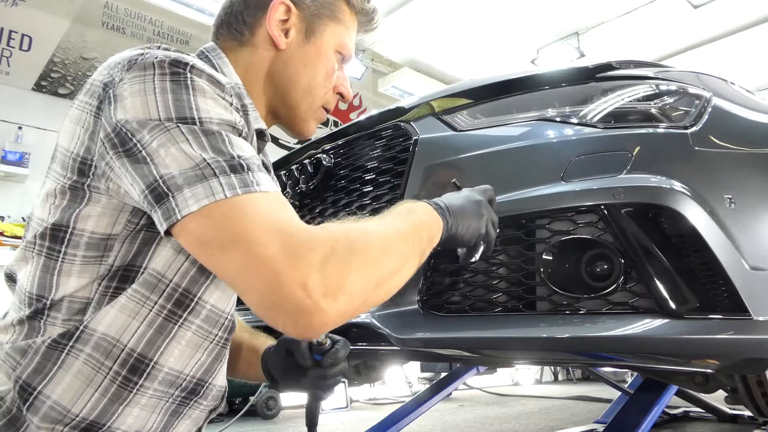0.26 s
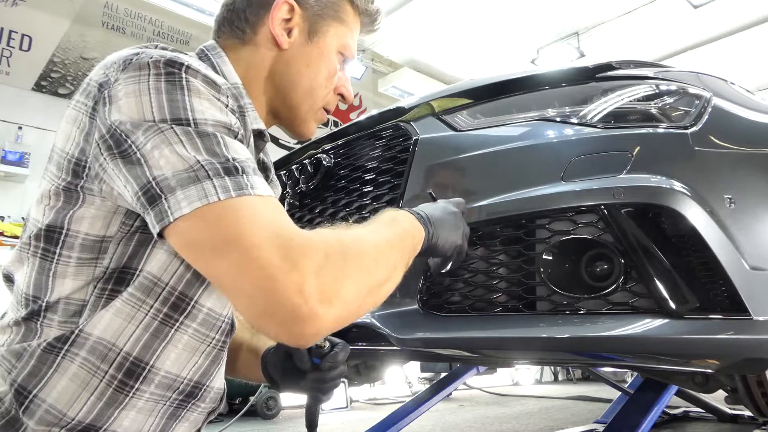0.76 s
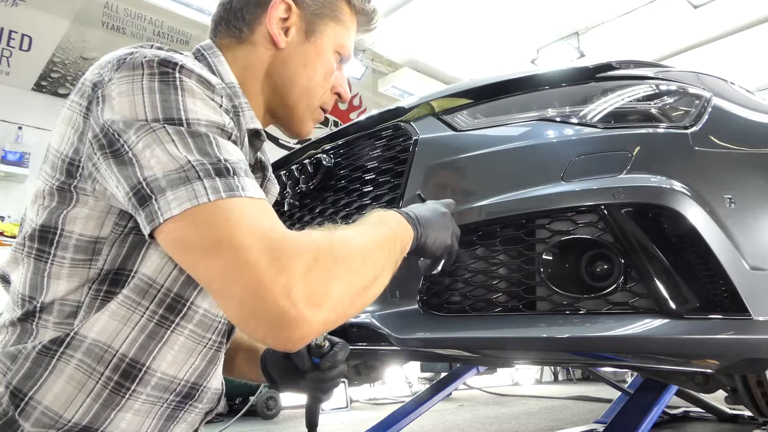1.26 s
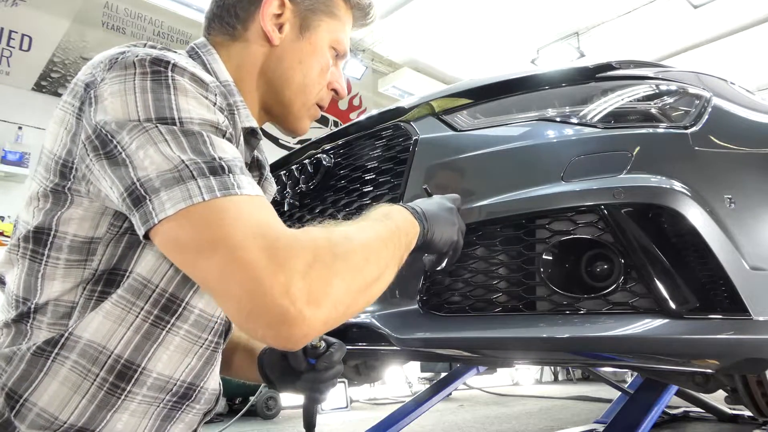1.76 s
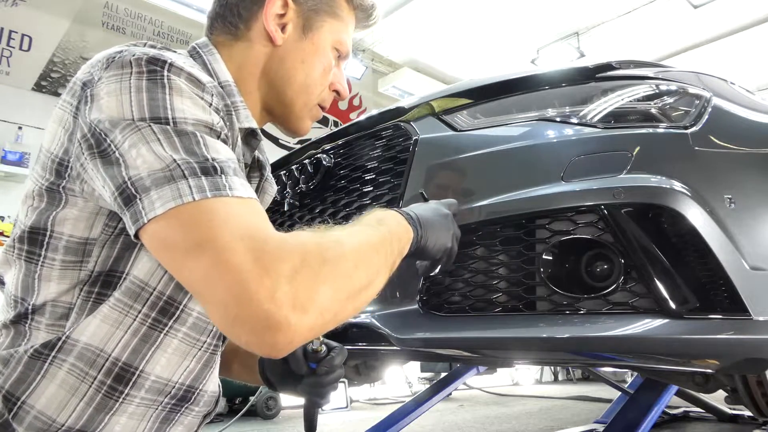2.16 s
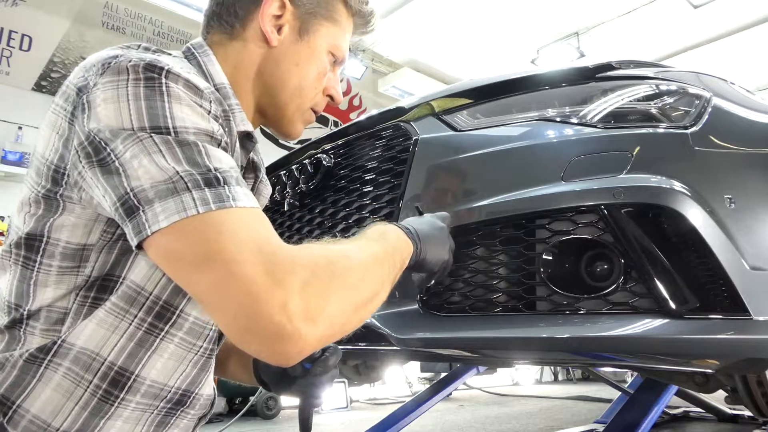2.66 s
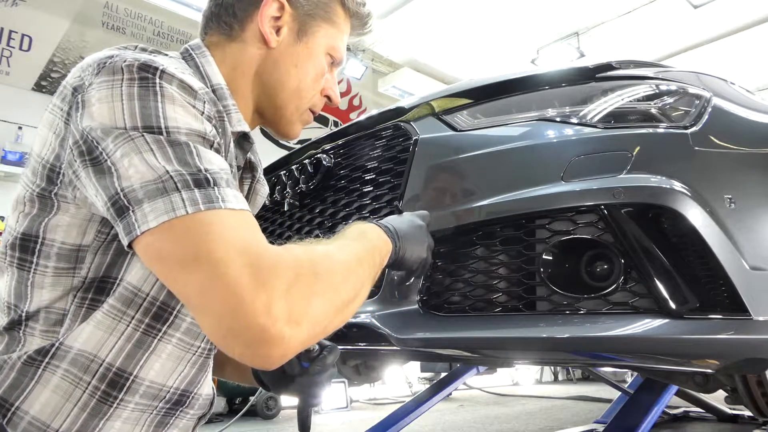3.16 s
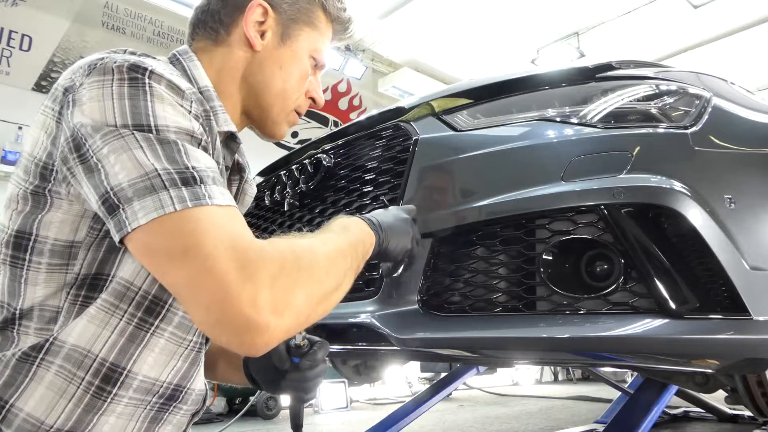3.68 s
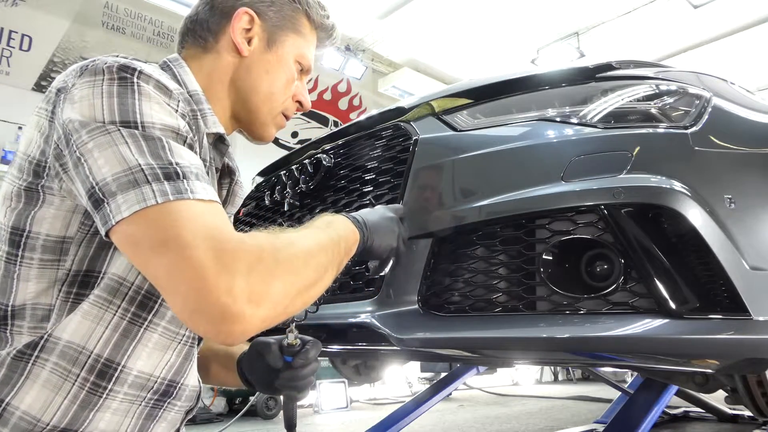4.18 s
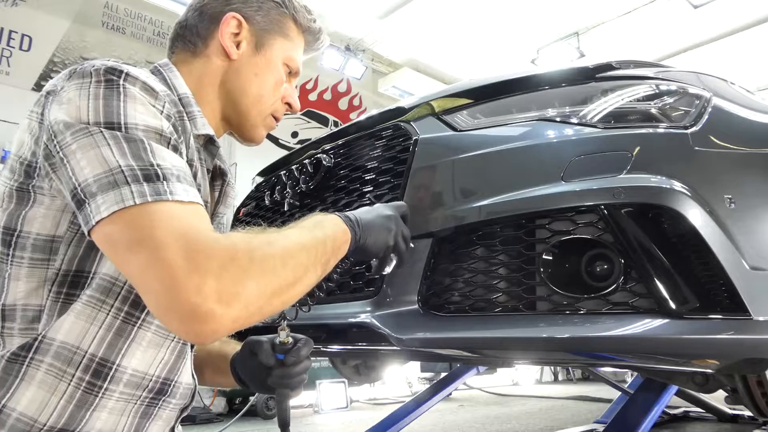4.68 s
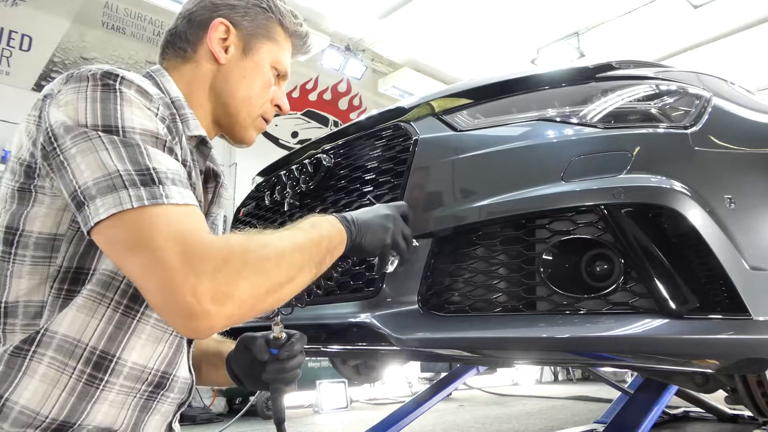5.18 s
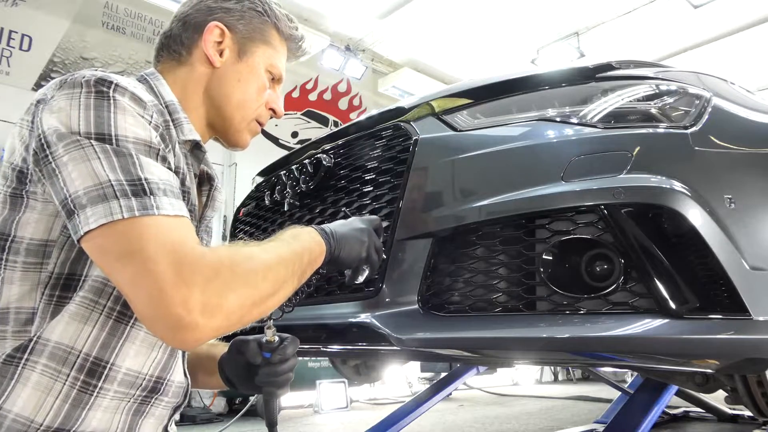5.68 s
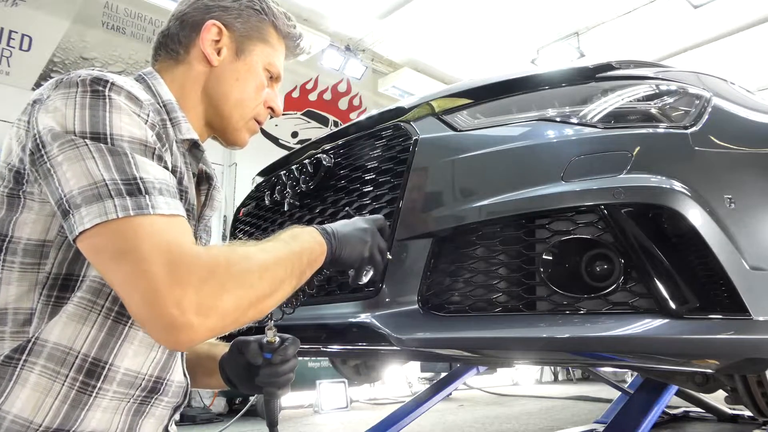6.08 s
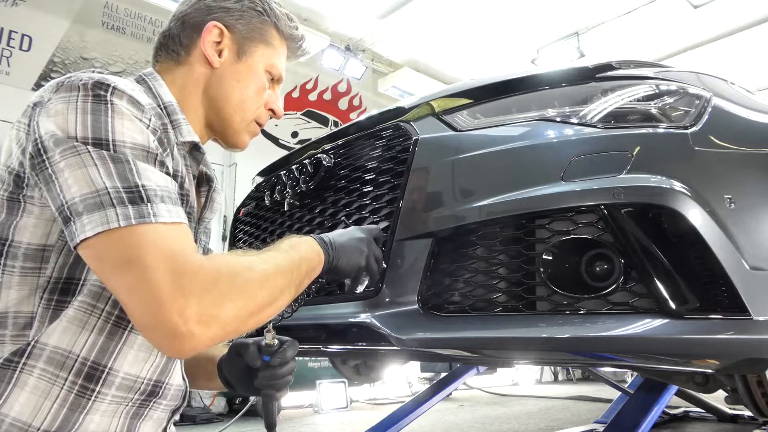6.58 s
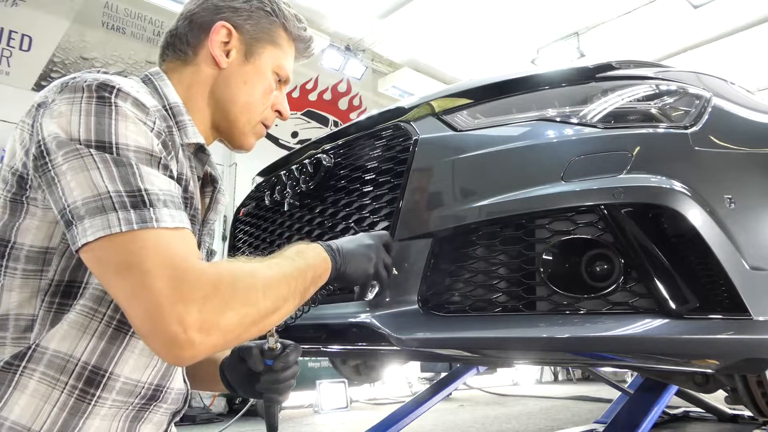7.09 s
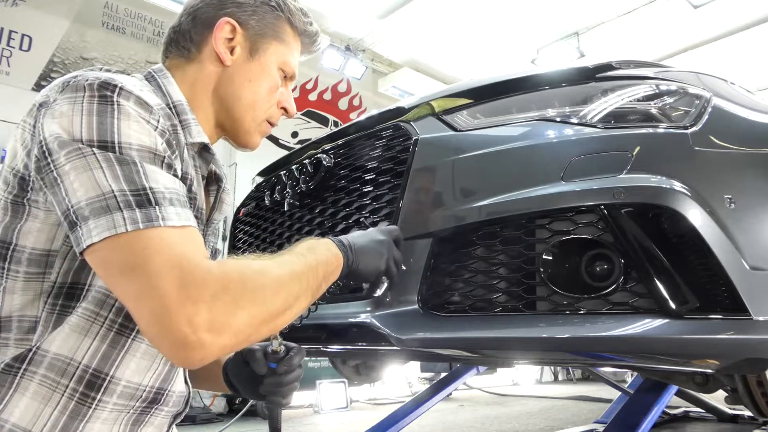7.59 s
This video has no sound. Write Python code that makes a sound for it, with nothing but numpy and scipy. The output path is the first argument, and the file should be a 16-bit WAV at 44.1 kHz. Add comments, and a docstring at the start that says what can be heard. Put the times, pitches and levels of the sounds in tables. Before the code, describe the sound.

In a hard-surfaced workshop, an airbrush close to the microphone spits eleven short, sharp hisses onto a car bumper, with pauses of about half a second to a second. Each opens abruptly, holds steady, shuts quickly and leaves a soft ring that loses its treble first. Low fan air and faint motor tones run underneath; late on, a faint distant rush rises and sinks slightly.

```python
"""Airbrush on a car bumper

Short trigger pulls of an airbrush in a workshop: each is a burst of filtered noise, shaped by a valve.
Resonances between hand and bumper colour it and shift as the hand works from corner vent to grille.
The room answers with noise that dies away, treble first; the ring of an earlier pull fades at the start.
Behind it are fan noise, thin motor tones and, late on, a faint far rush: a band of noise sliding in pitch."""
import sys
import numpy as np
from scipy import signal
from scipy.fft import rfft, irfft, next_fast_len
from scipy.io import wavfile
from scipy.ndimage import uniform_filter1d

SR = 44100
rng = np.random.default_rng(int(sys.argv[2]) if len(sys.argv) > 2 else 0)


def unload_wav(signal):
    """Save mono or channel-first audio to the path in sys.argv[1] as 16-bit WAV at rate SR, clipped to [-1, 1]."""
    wavfile.write(
        sys.argv[1],
        SR,
        np.round(np.clip(np.atleast_2d(signal).T, -1, 1) * 32767).astype(np.int16),
    )


N = 345744
SIZE = next_fast_len(N)  # a length that transforms quickly
TIME, HZ = np.arange(N) / SR, np.fft.rfftfreq(SIZE, 1 / SR)

# how alike the room's sound is in the two ears: pitch_hz, likeness (1 = the same, 0 = unrelated)
ROOM_LIKENESS = [(300, 0.15), (1300, 0.31), (2800, 0.78), (6500, 0.9), (10000, 0.73), (13500, 0.2)]


def airbrush(lead_s=0.003):
    """All trigger pulls along the hand's way; air starts to leak just before each is fully heard."""
    # one row a trigger pull: start_s, length_s, level_db (before the ear gains in scene),
    # hollow_db (lift of the hollow under the glove), gap (ring of the gap at the nozzle, 1 = usual)
    pulls = [(0.189, 0.14, -35, 8, 0.98), (.814, 0.14, -35, 8, 1.1), (1.274, 0.15, -36.5, 8, 0.75),
             (1.888, 0.12, -34.5, 8.5, 0.93), (2.749, 0.12, -35.5, 6.5, 1.6), (3.842, 0.13, -35, 9, 0.62),
             (4.37, 0.13, -35, 8, .3), (5.09, 0.13, -34.5, 1, .5), (5.828, 0.16, -34.5, 6.5, 0.089),
             (6.856, 0.16, -35, 0, 1.8), (7.354, 0.16, -34.5, 9.5, 1.4)]
    # the hand's way along the bumper: time_s, place (0 = at the corner vent, 1 = at the grille)
    hand = [(0, 0.15), (2.7, 0), (3.9, 0.67), (7.8, 0.85)]
    hand_s, hand_place = np.transpose(hand)
    out = np.zeros((2, N))
    for start_s, length_s, level_db, hollow_db, gap in pulls:
        place = np.interp(start_s, hand_s, hand_place)
        add(out, start_s - lead_s, pull(length_s, level_db, hollow_db, gap, place))
    return out


def pull(length_s, level_db, hollow_db, gap, place):
    """The valve snaps open, the jet builds up and hisses steadily, the valve shuts and the room rings on."""
    # colour of the air jet: pitch_hz, relative level_db (per Hz)
    jet_colour = [(120, -15.5), (550, -13.5), (900, -18.5), (1750, -12.5), (2500, -9.5), (3300, -8),
                  (4100, -6), (5200, -4.5), (6900, -2), (8200, -4.5), (9700, -1.5), (12500, -1),
                  (15400, -4)]
    # how alike the direct jet is in the two ears: pitch_hz, likeness (0 to 1)
    jet_likeness = [(200, 0.25), (1000, 0.55), (2500, 1), (8000, 0.99), (11000, 0.87), (15000, 0.7)]
    size = 2 ** 15
    t, hz = np.arange(size) / SR, np.fft.rfftfreq(size, 1 / SR)

    # a harder pull is brighter: the tilt, in dB per octave, grows with the level
    tilt_db = 0.52 + 0.42 * (level_db + 34.5)
    jet_db = read(jet_colour, hz) + tilt_db * np.log2((hz + 1) / 8000)
    low_cut = hz ** 2 / (hz ** 2 + 80 ** 2)
    jet = gain_of(jet_db) * low_cut

    # the hollow between glove and bumper resonates, differently as the hand moves
    near_db = hollow_db * bell(hz, between(2125, 2370, place), 150)
    # the narrow gap at the nozzle has a resonance and a notch; a tighter gap rings harder and higher
    gap_hz = 2970 + 140 * (gap - 1)
    near_db += gap * (4.5 * bell(hz, gap_hz, 244) - 9.5 * bell(hz, 3670, 120))
    # sizzle of the jet on the panel
    near_db += 3 * bell(hz, between(11600, 9600, place), 1300)
    # bounces off the curved panel
    near_db += ripple(len(hz), bounce_db=2.7)

    open_s, build_s, start_share = 0.0088, 0.011, 0.3
    close_s = 0.19 * length_s
    opening = np.clip(t / open_s, 0, 1)
    closing = np.clip((length_s - t) / close_s, 0, 1)
    build_up = 1 - (1 - start_share) * np.exp(-t / build_s)
    flow = gain_of(level_db) * opening * closing * build_up

    direct = noise(jet * gain_of(near_db), read(jet_likeness, hz), size) * flow
    # the room gathers the jet from all directions, with a weaker ripple of its own
    spread_gain = jet * gain_of(ripple(len(hz), bounce_db=2.2))
    spread = noise(spread_gain, read(ROOM_LIKENESS, hz), size)
    return direct + workshop(spread, flow)


def workshop(hiss, flow, first_s=0.0054, early_db=3, early_s=0.034):
    """The diffuse ring: the jet fills the room with power, which drains away, treble first."""
    # colour of the room's ring against the direct jet: pitch_hz, level_db
    room_colour = [(300, -1), (1000, -3), (2500, -5.5), (4500, -4.5), (7000, -6.5), (10000, -3.5),
                   (15000, -10)]
    # time the room takes to decay by 60 dB: pitch_hz, t60_s
    room_t60 = [(400, 1), (2000, 0.9), (4500, 0.83), (8000, 0.59), (11000, 0.43), (15000, 0.31)]
    # cut the hiss into short slices, each split into pitches
    hz, t, slices = signal.stft(hiss, SR, nperseg=256)
    fed_power = np.interp(t, np.arange(len(flow)) / SR, flow ** 2)
    loss = np.log(10 ** 6) / read(room_t60, hz)[:, None]
    response = loss * t[1] * np.exp(-loss * t)
    # strong early reflections off car and floor stand above the steady decay
    response *= gain_of(early_db * np.exp(-t / early_s)) ** 2
    # silent until first_s, then fading in over the same time again
    response *= np.clip(t / first_s - 1, 0, 1)
    power = abs(signal.fftconvolve(fed_power[None], response, axes=1)[:, :len(t)])
    ring = slices * np.sqrt(power) * gain_of(read(room_colour, hz))[:, None]
    return signal.istft(ring, SR, nperseg=256)[1][:, :len(flow)]


def lingering_ring(level_db=-64, t60_s=0.7):
    """The last part of an earlier pull's ring: a broad hump of noise that dies away from the start."""
    ring = noise(bell(HZ, 5000, 5000), read(ROOM_LIKENESS, HZ), SIZE)
    return ring * gain_of(level_db) * np.exp(-np.log(1000) * TIME / t60_s)


def ventilation(air_db=-64):
    """Broad moving air and the narrow drones of fans: steady noise, diffuse in the room."""
    # colour of the background air: pitch_hz, relative level_db (per Hz)
    air_colour = [(15, -46), (28, -15.5), (55, -10), (100, -3.5), (170, -2.5), (320, -5.5), (560, -6.5),
                  (800, -9), (1000, -12), (2000, -16.5), (3200, -19.5), (5000, -23), (8000, -26),
                  (10500, -23.5), (15500, -30)]
    # how alike the air is in the two ears: pitch_hz, likeness (below 0 = opposed)
    air_likeness = [(50, -0.096), (130, -0.4), (300, -0.44), (700, -0.31), (1500, -0.26), (5000, 0.33),
                    (14000, 0.45)]
    # narrow bands in which the fans drone: pitch_hz, width_hz, level_db
    fans = [(352.4, 14, -79), (417.5, 10, -77.5), (485, 12, -75), (587.6, 27, -74), (680, 23, -77.5),
            (777, 47, -79), (924, 17, -88), (1256, 49, -81.5), (2810, 140, -80)]
    air = gain_of(air_db) * noise(gain_of(read(air_colour, HZ)), read(air_likeness, HZ), SIZE)
    power = np.zeros(len(HZ))
    for pitch_hz, width_hz, level_db in fans:
        band = bell(HZ, pitch_hz, width_hz)
        power += gain_of(level_db) ** 2 * band / band.sum()
    drones = np.sqrt(power.sum()) * noise(np.sqrt(power), 0.6, SIZE)
    return air + drones


def motors(wander_hz=1.51, waver_db=2, side_share=0.54):
    """Thin, slightly wandering tones of the fan motors, at another phase in each ear."""
    # steady part of the tones: pitch_hz, level_db (peak of the part both ears share)
    hum = [(100, -84), (481, -83.5), (590, -82)]
    out = np.zeros((2, N))
    for pitch_hz, level_db in hum:
        wandering_hz = pitch_hz + wander_hz * flutter(N, count=5000)
        phase = 2 * np.pi * np.cumsum(wandering_hz) / SR
        mid, side = np.sin(phase), side_share * np.cos(phase)
        level = gain_of(level_db + waver_db * flutter(N, count=9000))
        out += np.array([mid + side, mid - side]) * level
    return out


def far_rush(width_hz=200):
    """A soft band of noise, shifted in pitch so that it climbs and sinks back partway."""
    # path of the rush: time_s, pitch_hz (centre of the band), level_db
    rush = [(5.2, 608, -99), (5.601, 720, -77), (6.1, 873, -69), (6.5, 857, -73.5), (7.001, 813, -79),
            (7.799, 773, -74)]
    time_s, pitch_hz, level_db = np.transpose(rush)
    turns = np.cumsum(np.interp(TIME, time_s, pitch_hz)) / SR
    low_band = signal.hilbert(noise(bell(HZ, 0, width_hz), 0.26, SIZE))
    band = low_band * np.exp(2j * np.pi * turns)  # moves the noise up to its pitch
    return band.real * gain_of(np.interp(TIME, time_s, level_db))


def ripple(size, bounce_db, first_s=0.000804, last_s=0.011, count=30):
    """Bounces with slightly longer paths interfere: a fine random comb in dB over size pitches."""
    hz = np.linspace(0, SR / 2, size)
    delay_s = rng.uniform(first_s, last_s, (count, 1))
    turns = hz * delay_s + rng.random((count, 1))
    return bounce_db * evened(np.cos(2 * np.pi * turns).sum(0))


def noise(gain, likeness, size):
    """Stereo noise of rms 1 (after any trim to N) with a given spectrum and left-right likeness."""
    a, b = rfft(rng.standard_normal((2, size)))
    likeness = np.clip(likeness, -1, 1)
    mid, side = a * np.sqrt(1 + likeness), b * np.sqrt(1 - likeness)
    return evened(irfft(np.array([mid + side, mid - side]) * gain, size)[:, :N])


def flutter(size, count):
    """Slow random wander of rms 1, smoothed twice over count samples."""
    smooth = uniform_filter1d(rng.standard_normal(size), count)
    return evened(uniform_filter1d(smooth, count))


def gain_of(db):
    """Decibels to amplitude."""
    return 10 ** (np.asarray(db) / 20)


def evened(x):
    """Scales to rms 1 (average strength)."""
    return x / np.sqrt(np.mean(x ** 2) + 1e-20)


def read(points, hz):
    """Reads between the points of a (pitch_hz, value) table, with pitch on a logarithmic scale."""
    pitch_hz, value = np.transpose(points)
    return np.interp(np.log(hz + 1), np.log(pitch_hz + 1), value)


def bell(hz, centre_hz, width_hz):
    """A smooth hump of height 1, down to 1/e at width_hz from its centre."""
    return np.exp(-((hz - centre_hz) / width_hz) ** 2)


def between(vent, grille, place):
    """A value on the way from the vent (place 0) to the grille (place 1)."""
    return vent + (grille - vent) * place


def add(mix, start_s, sound):
    """Mixes a stereo sound in at start_s, cut off at the end of the mix."""
    part = mix[:, round(start_s * SR):][:, :sound.shape[1]]
    part += sound[:, :part.shape[1]]


def scene(left_db=1.35, right_db=1.74):
    """The spray, slightly to the right, over the background of the workshop."""
    spray = airbrush() * gain_of([[left_db], [right_db]])
    return spray + lingering_ring() + ventilation() + motors() + far_rush()


def record(dry, edge_hz=15800):
    """The recorder's band limit: a steep filter takes away the treble above edge_hz."""
    low_pass = signal.firwin(511, edge_hz, window=("kaiser", 9), fs=SR)
    return signal.oaconvolve(dry, low_pass[None], "same")


dry = scene()
out = record(dry)
unload_wav(out)
```